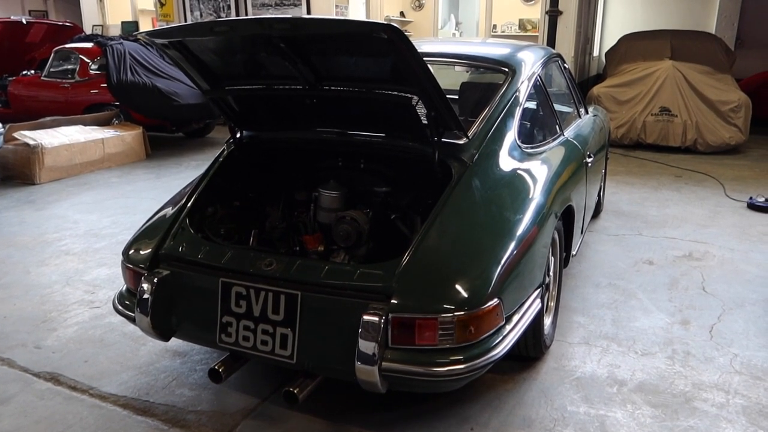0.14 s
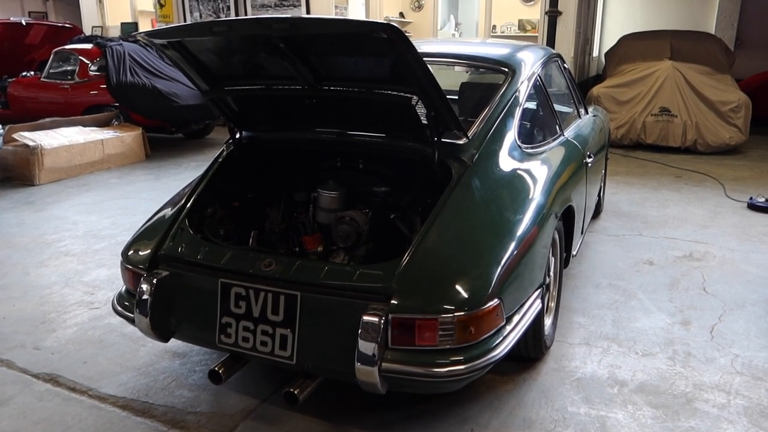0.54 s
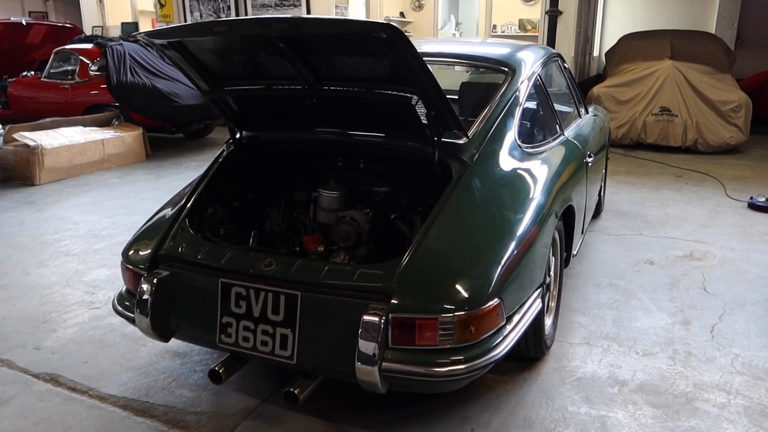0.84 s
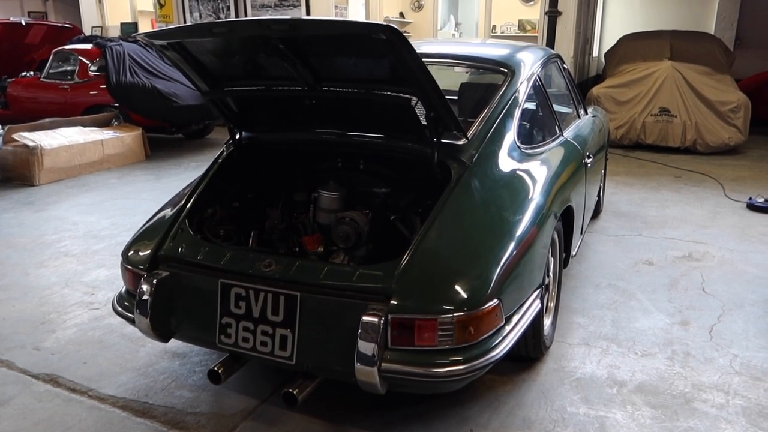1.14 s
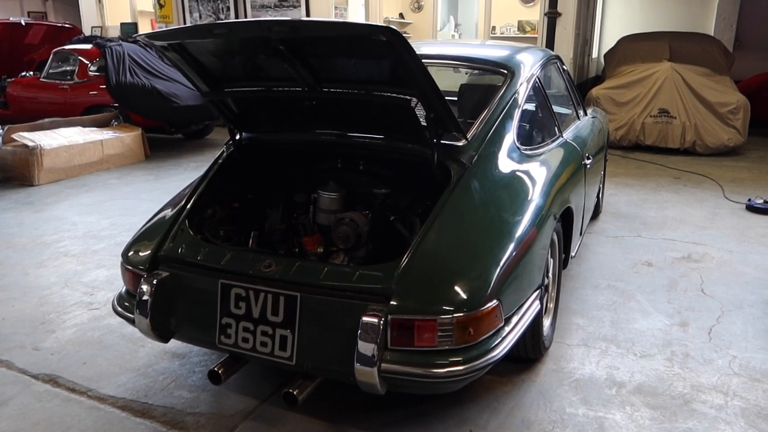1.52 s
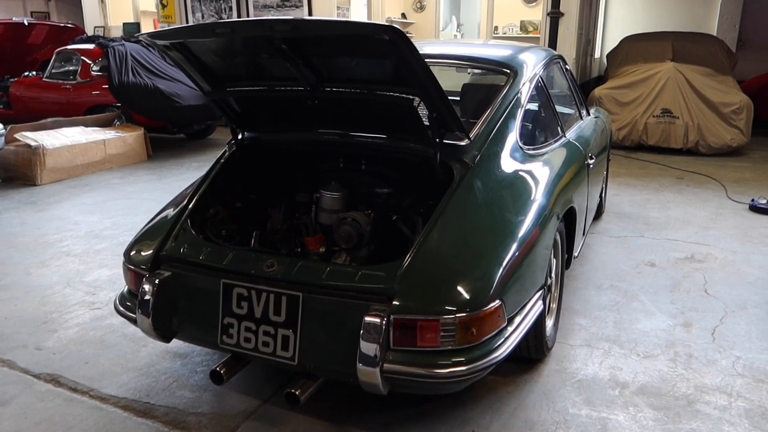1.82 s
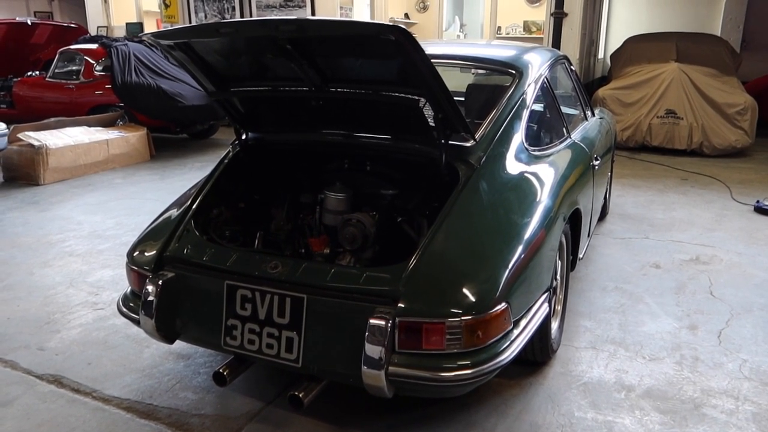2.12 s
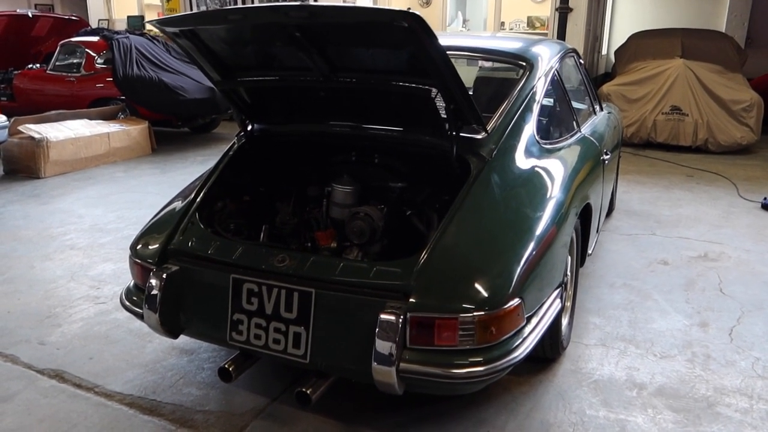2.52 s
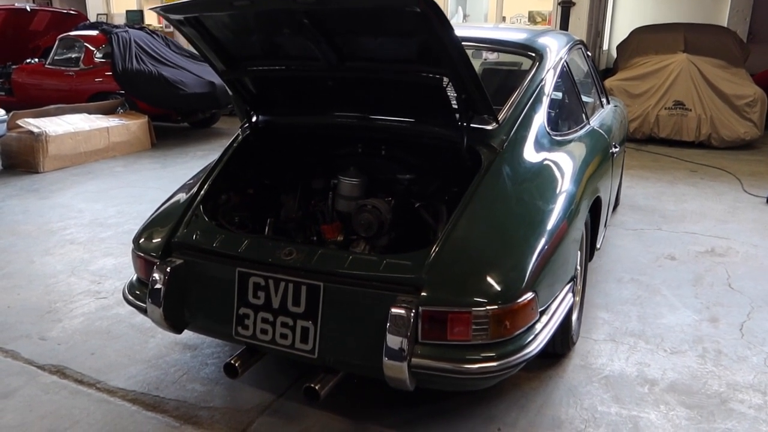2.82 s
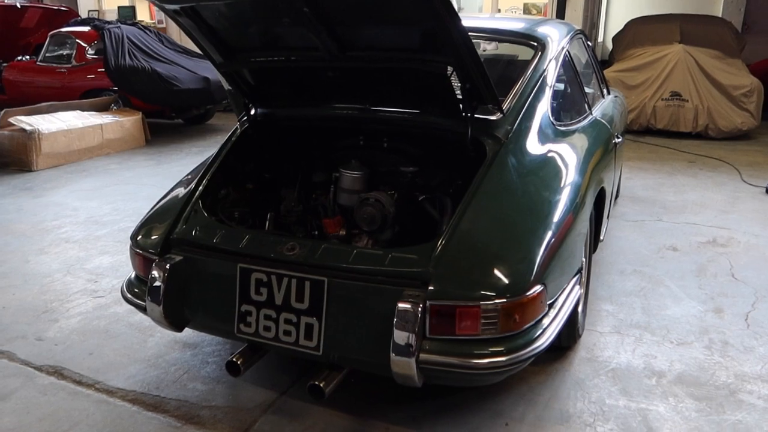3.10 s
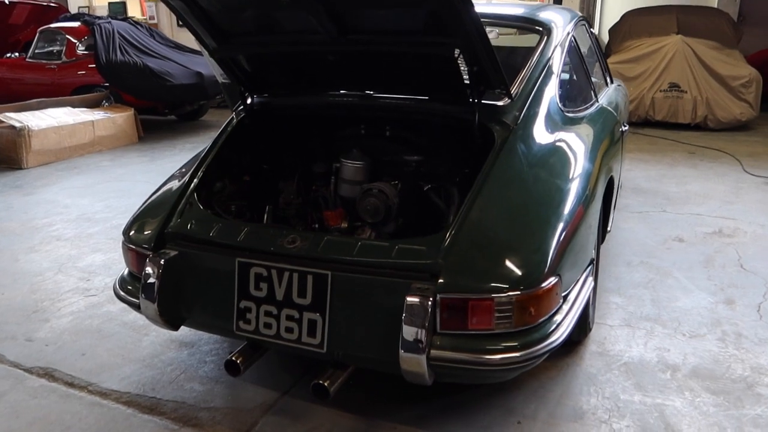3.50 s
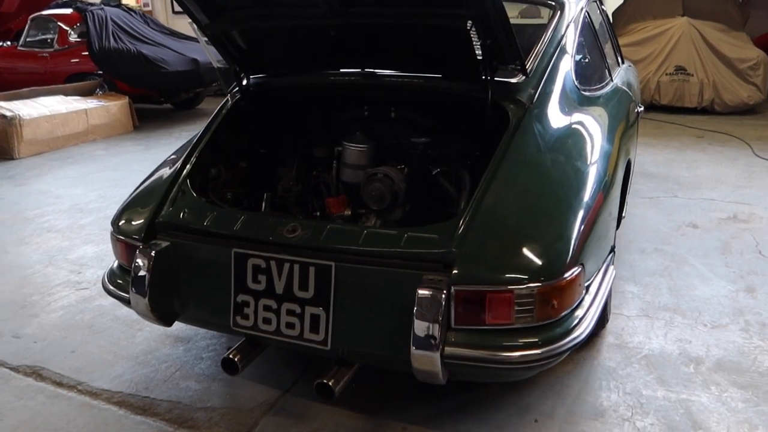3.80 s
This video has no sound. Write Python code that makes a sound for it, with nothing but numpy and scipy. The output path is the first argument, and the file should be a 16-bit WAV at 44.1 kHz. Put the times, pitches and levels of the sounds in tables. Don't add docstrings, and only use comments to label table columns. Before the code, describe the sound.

A car engine is cranked by a rattling starter, catches with uneven coughs and spits, then is blipped three times, the last highest, and winds down; close stereo microphone behind the exhaust, hard-floored workshop.

```python
import sys
import numpy as np
from scipy import signal
from scipy.fft import rfft, irfft, next_fast_len
from scipy.io import wavfile
from scipy.ndimage import map_coordinates

SR = 44100
rng = np.random.default_rng(int(sys.argv[2]) if len(sys.argv) > 2 else 0)


def ratio(d):
    e = np.asarray(d, float) / 20
    return 10 ** e


def unload_audio(sound):
    columns = np.transpose(np.atleast_2d(sound))
    steps = np.round(np.clip(columns, -1, 1) * 32767)
    wavfile.write(sys.argv[1], SR, steps.astype(np.int16))


N = 174195
TIME = np.arange(N) / SR

# f/Hz, density level/dB
INTAKE_MID = [(880, -50.5), (1500, -48.5), (1810, 13.5), (6770, -2), (7750, -9), (8100, -72), (9000, -99),
              (11700, -129), (19800, -120)]
INTAKE_SIDE = [(1180, -52.5), (2000, -20), (2310, -6.5), (2500, -74), (3290, -74), (3460, -8.5),
               (4110, 5.5), (15500, 2)]


def rms_one(x):
    return x / np.sqrt(np.mean(x ** 2) + 1e-20)


def in_time(rows):
    s, *columns = np.transpose(rows)
    return [np.interp(TIME, s, c) for c in columns]


def drift(rate):
    steps = rng.standard_normal(400)
    return map_coordinates(steps, [TIME * 2 * rate], order=3)


def low_pass(order, hz):
    return signal.butter(order, hz, fs=SR, output="sos")


def resonate(x, peaks, sign=-1):
    out = 0
    for k, (hz, width, db) in enumerate(peaks):
        r = np.exp(-np.pi * width / SR)
        zeros = [(1 - r * r) / 2, 0, (r * r - 1) / 2]
        poles = [1, -2 * r * np.cos(2 * np.pi * hz / SR), r * r]
        out = out + sign ** k * ratio(db) * signal.lfilter(zeros, poles, x + 1e-18)
    return out


def colour(x, points, phase=0):
    size = next_fast_len(N)
    hz, db = np.transpose(points)
    f = np.arange(size // 2 + 1) * SR / size + 1
    gain = ratio(np.interp(np.log(f), np.log(hz), db, left=-70, right=-90))
    return irfft(rfft(x, size) * gain * np.exp(1j * phase), size)[:N]


def ports(envelope, grain, mid, side, side_db):
    likeness, phase = 0.58, 1.14
    other = likeness * grain + np.sqrt(1 - likeness ** 2) * rng.standard_normal(N)
    mid_scale = 1 / np.std(colour(grain, mid))
    side_scale = ratio(side_db) / np.std(colour(other, side))
    m = mid_scale * colour(envelope * grain, mid)
    s = side_scale * colour(envelope * other, side, phase)
    return np.array([m + s, m - s])


def grains(rate, spread_db, noise):
    sizes = ratio(spread_db * np.minimum(rng.exponential(1, N), 4)) * rng.choice([-1, 1], N)
    contacts = rms_one(sizes * (rng.random(N) < rate / SR))
    return rms_one(contacts + noise * rng.standard_normal(N))


def turns():
    # t/s, speed/(turns per s)
    speed = [(.8, 20.8), (.98, 27.8), (1.17, 37), (1.33, 29.5), (1.56, 22.4), (1.69, 33.8), (1.76, 39),
             (1.89, 53), (1.955, 55.6), (2.09, 48.9), (2.33, 41), (2.61, 30.7), (2.76, 41.5), (2.84, 49.4),
             (2.91, 53.3), (3.0, 60.4), (3.34, 45.6), (3.65, 35.5), (3.95, 22.5)]
    first_firing_s = 1.157
    angle = np.cumsum(in_time(speed)[0]) / SR
    return angle - angle[int(first_firing_s * SR)]


def gate(lag):
    part = (turns() - lag) % 1
    return np.exp(-1.32 * (part % .5)) * np.where(part < .5, 1, .6)


def crank_tones(phase, third_db):
    firing_db, third_db = firing_and_third = third_db
    # t/s, level/dB
    throb = [(.8, -38), (1.76, -46), (1.85, -25.5), (1.96, -40), (2.04, -25), (2.22, -20.5), (2.29, -39),
             (2.76, -37), (2.84, -31.5), (3.4, -39), (3.5, -45), (3.95, -46)]
    flutter_db = 1.2
    firing = ratio(firing_db + flutter_db * drift(14)) * np.cos(2 * phase)
    third = ratio(third_db + flutter_db * drift(14)) * np.cos(3 * phase)
    return firing + third + ratio(in_time(throb)[0]) * np.cos(phase)


def firing_pulses(puff_db):
    cylinder_db = [0.2, 3.5, 5, -.8]
    # t/s, level/dB
    catches = [(.006, -38), (0.142, -25), (0.269, -31), (0.398, -12.5), (0.484, -9.5), (.609, -9.5),
               (0.702, -11.5), (0.738, -9.5), (0.802, -6.5), (.828, -20), (0.851, -16.5), (.899, -9),
               (0.915, -14.5), (0.952, -10.5), (.972, -11), (1.022, -10), (1.04, -7), (1.089, -11.5),
               (1.107, -8.5), (1.118, -12.5), (1.139, -12), (1.46, -11.5), (1.584, -15.5), (1.621, -14),
               (1.691, -18.5)]
    jitter_turns, spread_db, bank_imbalance = 0.006, 3.5, .15
    count = np.arange(320)
    luck = rng.standard_normal((320, 2))
    at = np.searchsorted(turns(), count / 2 + jitter_turns * luck[:, 0])
    keep = at < N
    at, count, luck = at[keep], count[keep], luck[keep]
    strength_db = puff_db[at] + np.take(cylinder_db, count % 4) + spread_db * luck[:, 1]
    pulses = np.zeros(N)
    pulses[at] = ratio(strength_db) * (1 + bank_imbalance * (-1) ** count)
    for s, db in catches:
        pulses[int(s * SR)] = ratio(db)
    silencer = low_pass(3, 165.3)
    return signal.sosfilt(silencer, np.roll(pulses, -25) + 1e-18)


def exhaust():
    # t/s, firing tone level/dB, third-order tone level/dB, uneven puffs level/dB, other orders level/dB
    load = [(.79, -14.5, -24, -16, -6.5), (.96, -25, -44, -19, -22), (1.12, -20.5, -38, -17.5, -27),
            (1.2, -21, -38, -28, -15), (1.33, -14.5, -22, -27.5, -19.5), (1.55, -23, -31, -22.5, -12.5),
            (1.67, -24.5, -26, -33, -8.5), (1.76, -13, -13.5, -32.5, -19), (1.88, -21, -4.5, -35.5, -17.5),
            (1.96, -26.5, -9.5, -34, -20), (2.02, -19, -16.5, -39, -24), (2.25, -19.5, -12, -28, -16.5),
            (2.42, -16.5, -14, -34, -23.5), (2.6, -23, -29, -31, -21), (2.76, -13.5, -9.5, -30.5, -18.5),
            (2.91, -18, -5.5, -38, -21), (3.02, -26.5, -24.5, -36.5, -30.5), (3.95, -25.5, -31, -39, -32.5)]
    # t/s, level/dB
    coast_swell = [(3.0, -3), (3.08, -6.5), (3.18, 4), (3.34, -3), (3.55, 5.5), (3.78, -15)]
    misfires_s = [0.93, 0.87]
    # multiple of crank speed, level/dB
    orders = [(4, -5.5), (5, -8.5), (6, -14), (8, -15.5)]
    # f/Hz, width/Hz, level/dB
    pipe_modes = [(54, 17.2, 9.5), (76, 26.3, -0.5), (123, 28, 0), (152.5, 13.8, 5), (224, 100, -3)]
    firing_db, third_db, puff_db, other_db = in_time(load)
    misfire_db, misfire_width_s = -28.5, 0.0074
    lapse_db = misfire_db * sum(np.exp(-.5 * ((TIME - s) / misfire_width_s) ** 2) for s in misfires_s)
    phase = 2 * np.pi * turns()
    on = np.clip((TIME - .78) / 0.1, 0, 1)
    swell_db = in_time(coast_swell)[0]
    tones = crank_tones(phase, (firing_db + lapse_db, third_db + lapse_db + swell_db))
    rest = sum(ratio(db + 2.4 * drift(9.2)) * np.cos(k * phase) for k, db in orders)
    pulses = firing_pulses(puff_db + lapse_db)
    early = TIME < .45
    slow = resonate(330 * pulses * early, pipe_modes[:1])
    pulses = pulses * ~early
    drive = 190 * pulses + on * ratio(other_db + lapse_db) * rest
    direct = 190 * 0.48 * pulses
    return slow + resonate(drive, pipe_modes, sign=1) + direct, np.sqrt(2) * on * tones


def intake():
    # t/s, level/dB
    throttle = [(.35, -52), (.45, -39), (.72, -32), (.9, -32.5), (1.0, -40), (1.12, -34), (1.25, -41.5),
                (1.52, -50), (1.56, -35.5), (1.88, -34), (1.97, -43.5), (2.08, -33.5), (2.2, -41),
                (2.6, -49.5), (2.74, -33), (2.87, -33), (2.95, -40.5), (3.95, -61)]
    # t/s, level/dB
    spit_events = [(0.125, -17.5), (0.476, -17.5), (0.499, -26.5), (0.578, -23.5), (0.601, -14.5),
                   (.657, -29.5), (0.692, -15.5), (0.714, -24), (.734, -29.5), (.776, -23.5), (.797, -27),
                   (0.821, -22), (.848, -28), (.87, -24.5), (.935, -30), (1.019, -28.5), (1.084, -24.5),
                   (1.453, -26), (1.538, -28), (1.581, -27), (1.617, -33.5), (1.74, -32), (2.555, -39),
                   (2.617, -40.5)]
    spit_t60_s, spit_rise_s, lag_turns = 0.054, 0.0041, 0.032
    spits = 0
    for s, db in spit_events:
        decay = ratio(db - 60 * np.maximum(TIME - s, 0) / spit_t60_s)
        spits = spits + decay * np.clip((TIME - s) / spit_rise_s, 0, 1)
    flow = ratio(in_time(throttle)[0] + 1.6 * drift(25)) * 2 * gate(lag_turns)
    air = rng.standard_normal(N)
    ring = ratio(1) * rms_one(resonate(air, [(4100, 500, 0)])) * spits
    hiss = ports(flow, air, INTAKE_MID, INTAKE_SIDE, side_db=0)
    return hiss + ports(spits, air, INTAKE_MID, INTAKE_SIDE, side_db=6) + ring


def ticks():
    # t/s, level/dB, f/Hz, width/Hz
    bursts = [(.474, -46, 11100, 6000), (.607, -37, 9120, 700), (.607, -37, 12570, 1400),
              (0.608, -46, 13900, 900), (0.698, -33, 10070, 600), (.699, -51, 11970, 400),
              (1.028, -45.5, 11500, 6460), (1.454, -55, 9940, 600), (1.541, -52, 9300, 600),
              (1.584, -51.5, 11600, 500), (1.609, -48.5, 10060, 3996), (2.62, -52, 10760, 600),
              (2.652, -53, 11600, 6000), (2.678, -53, 9700, 497)]
    air, out = rng.standard_normal(N), 0
    for s, db, hz, width in bursts:
        edges = [hz - width / 2, hz + width / 2]
        band = signal.sosfilt(signal.butter(3, edges, "band", fs=SR, output="sos"), air)
        length_s = 0.0039 if width < 2000 else 0.008
        out = out + ratio(db) * rms_one(band) * np.exp(-.5 * ((TIME - s) / length_s) ** 2)
    return out


def starter():
    # t/s, level/dB
    effort_db = [(0, -21.5), (.13, -18), (.19, -20.5), (.25, -18), (.34, -22.5), (.46, -15.5), (.53, -20.5),
                 (.595, -18.5), (.65, -23.5), (.95, -26)]
    # f/Hz, width/Hz, level/dB
    housing = [(893, 18, -9.5), (958, 11, -3), (1082.4, 40, -2.5), (1249, 29, -7), (1453, 38, -9),
               (1685, 35, -7), (2160, 43, -14.5), (3070, 54, -13), (3300, 59, -17), (3550, 75, -14.5),
               (3800, 43, -20.5), (4330, 63, -20.5), (4700, 72, -17)]
    # f/Hz, density level/dB
    common = [(59, -58), (100, -9.5), (334, -13.5), (486, -8), (750, -16.5), (994, -7), (2450, -17.5),
              (4740, -17.5), (9000, -53.5), (11700, -73.5), (19800, -120)]
    differing = [(240, -51), (400, -25), (614, -28.5), (900, -3), (2190, -10), (2510, -17.5), (4630, 2.5),
                 (9350, -9.5), (15500, -69)]
    effort = ratio(in_time([*effort_db, (1.1, -45)])[0])
    teeth = grains(900, spread_db=4, noise=1.3)
    later = np.clip(TIME / 0.27 - 1, -1, 1)
    rings = 0
    for hz, width, db in housing:
        shift_db = 60 * np.clip(hz / 1050 - 1, -.1, .05) * (hz < 1300)
        mode = resonate(rng.standard_normal(N), [(hz, width, db)])
        rings = rings + ratio(4 * drift(14) + shift_db * later) * mode
    whine = ratio(-7) * rms_one(resonate(rng.standard_normal(N), [(9300, 150, 0)]))
    rattle = ports(effort, teeth + whine, common, differing, side_db=-12.5)
    return rattle + effort * ratio(-2.5) * rms_one(rings)


def casing():
    # t/s, level/dB
    clatter = [(.79, -25), (.96, -25.5), (1.12, -24), (1.2, -26.5), (1.3, -23), (1.55, -25.5),
               (1.76, -22.5), (1.88, -21.5), (1.945, -27), (1.99, -25.5), (2.08, -20), (2.18, -20),
               (2.24, -24), (2.6, -28), (2.74, -21), (2.86, -20.5), (2.94, -27.5), (3.95, -38)]
    # f/Hz, width/Hz, level/dB
    shroud_modes = [(1159, 95, 7.5), (1828, 51, 20.5), (388, 37, 0.5), (3510, 293, 8.5)]
    # f/Hz, density level/dB
    common = [(120, -94.5), (200, -4), (436, -6.5), (630, -9), (894, -14), (1230, -10.5), (3630, -21.5),
              (7920, -50.5), (9000, -79.5), (11700, -110), (19800, -120)]
    differing = [(240, -38.5), (400, -7.5), (643, -9.5), (726, -14), (1470, 0.5), (2710, -16), (4350, 0.5),
                 (9350, -3.5), (15500, -34.5)]
    gate_depth = 0.21
    level = ratio(in_time(clatter)[0] + 1.2 * drift(8.3))
    level = level * (1 - gate_depth + 2 * gate_depth * gate(0.0027))
    level = level * np.clip((TIME - .4) / 0.26, 0, 1)
    taps = grains(1600, spread_db=-1.5, noise=2.57)
    ringing = level * ratio(-8.5) * rms_one(resonate(taps, shroud_modes))
    return ports(level, taps, common, differing, side_db=-18.5) + ringing


def workshop(x):
    t60_s, level_db = .4, -8
    t = np.arange(SR // 2) / SR
    tail = rng.standard_normal(len(t)) * ratio(-60 * t / t60_s) * (t > .012)
    return ratio(level_db) * signal.fftconvolve(x, tail / np.sqrt(np.sum(tail ** 2)))[:N]


def scene():
    pipes, tones = exhaust()
    left, right = -(tones + pipes + workshop(pipes)) + starter() + casing() + intake()
    shared, side = (left + right) / 2, (left - right) / 2
    mid = signal.sosfiltfilt(low_pass(8, 7970), shared)
    mid = mid + ratio(-28) * (shared - mid) + ticks()
    return np.array([mid + side, mid - side])


def band_limit(x):
    return signal.sosfilt(signal.butter(12, 15730, fs=SR, output="sos"), x)


def record(dry):
    x = signal.sosfiltfilt(signal.butter(3, 35, "high", fs=SR, output="sos"), dry)
    ceiling = 1.17
    left, right = ceiling * np.tanh(x / ceiling)
    mid = (left + right) / 2
    side = signal.sosfiltfilt(low_pass(2, 12400), left - right) / 2
    return band_limit(np.array([mid + side, mid - side]))


dry = scene()
out = record(dry)
unload_audio(out)
```